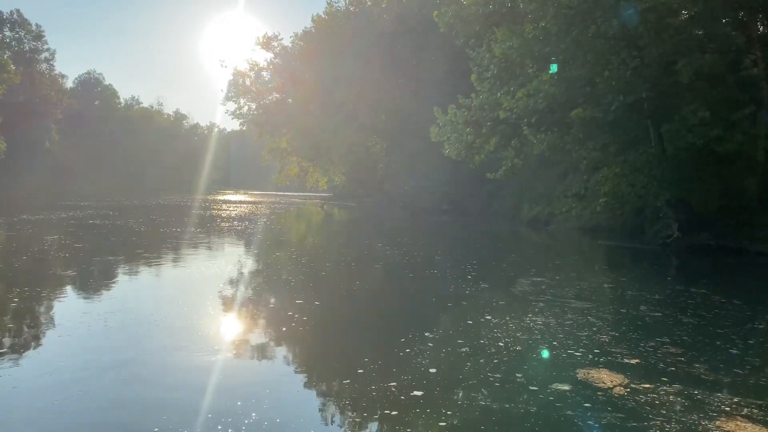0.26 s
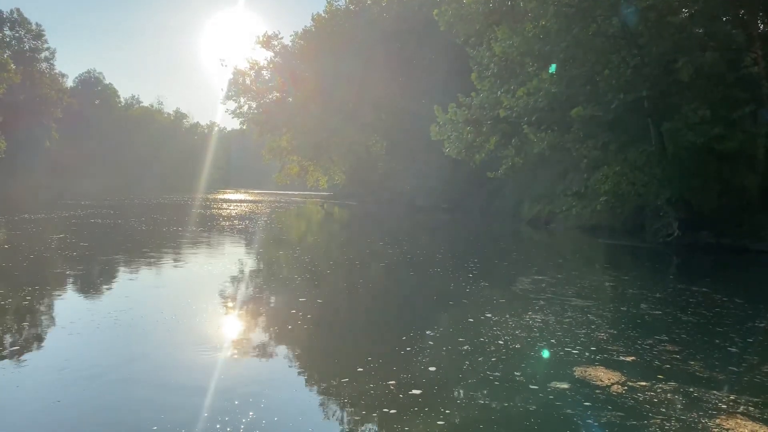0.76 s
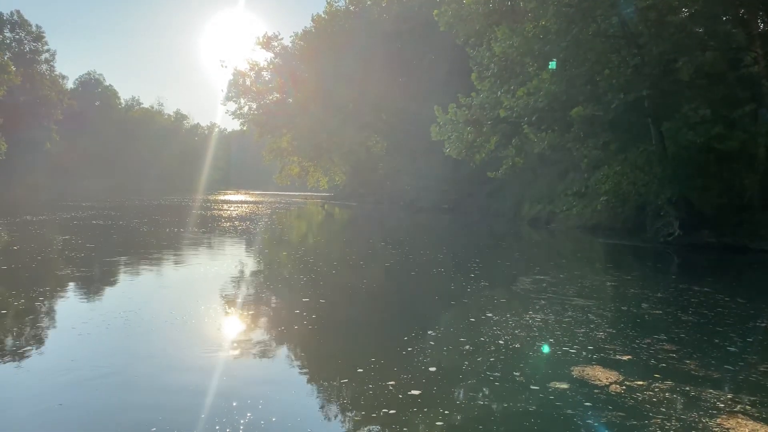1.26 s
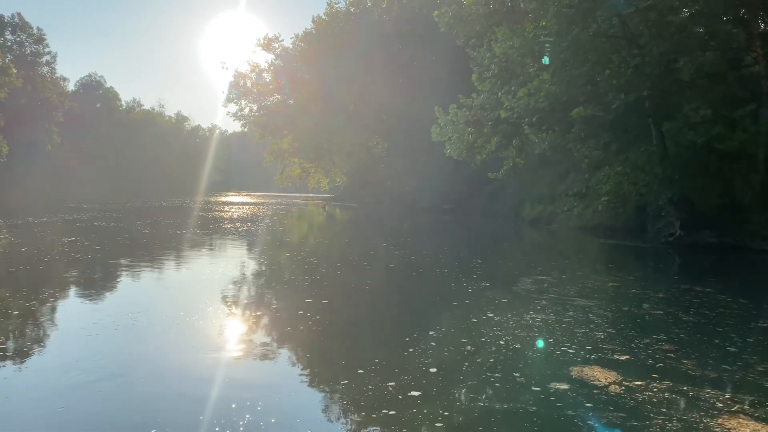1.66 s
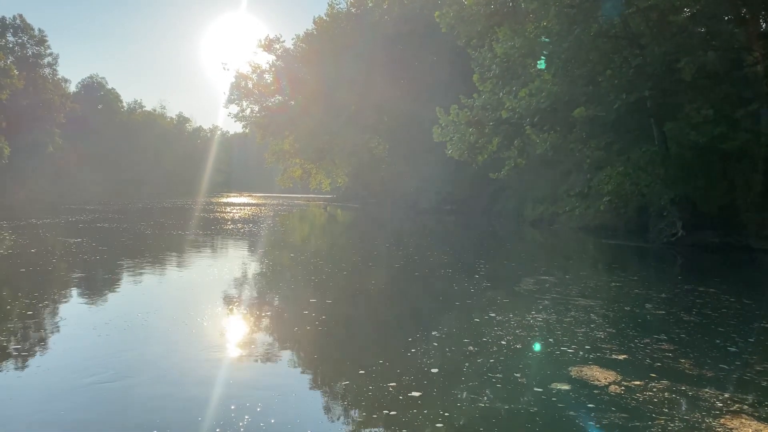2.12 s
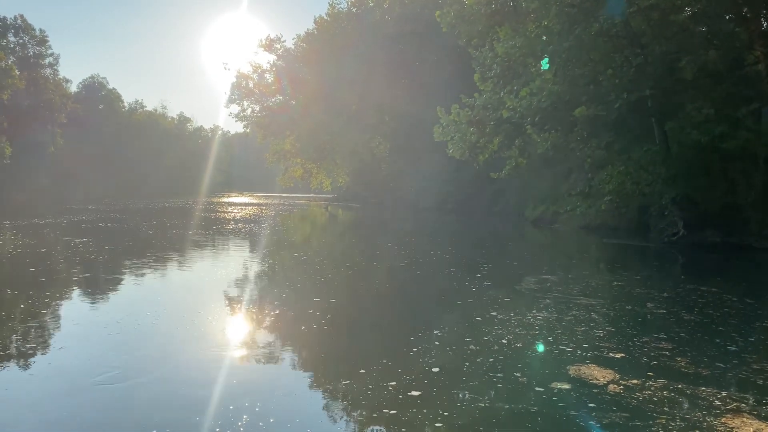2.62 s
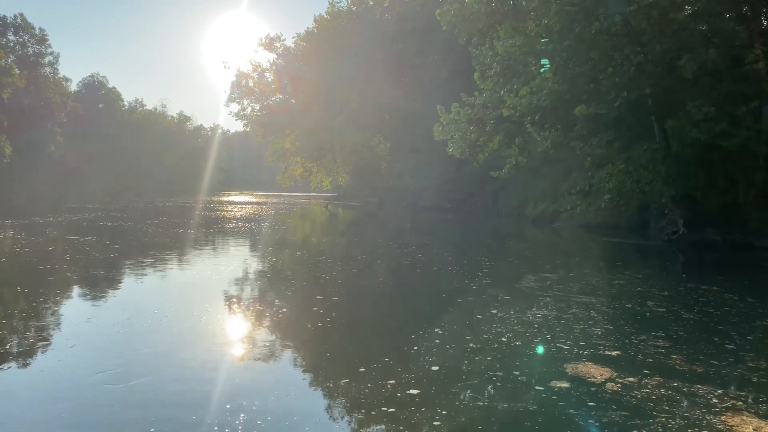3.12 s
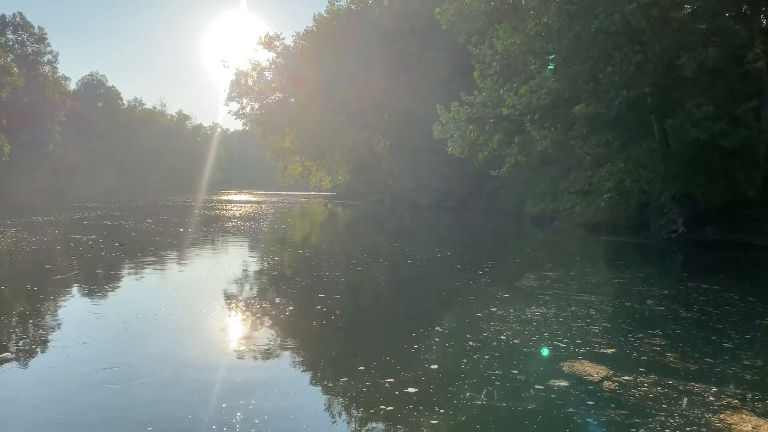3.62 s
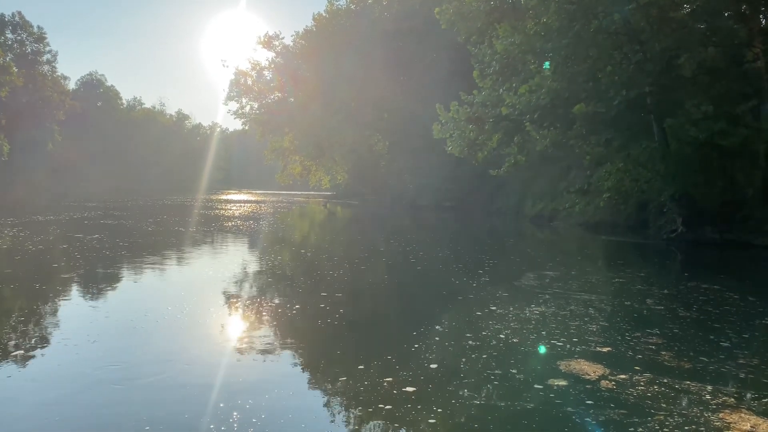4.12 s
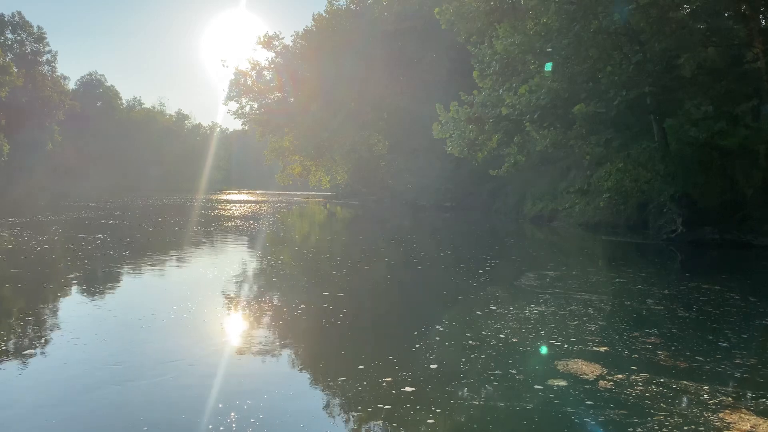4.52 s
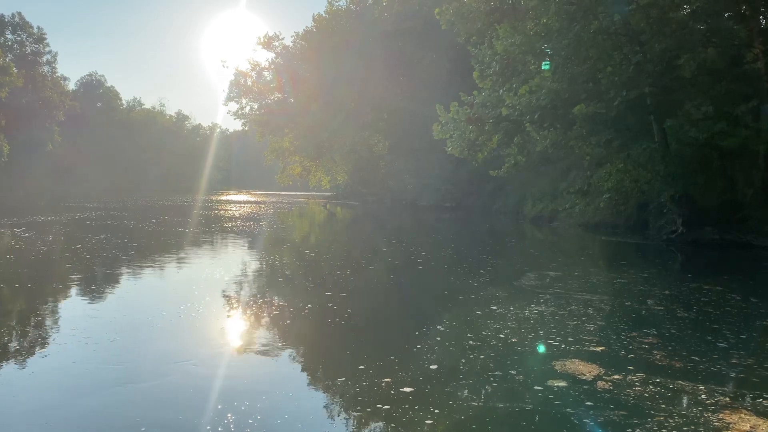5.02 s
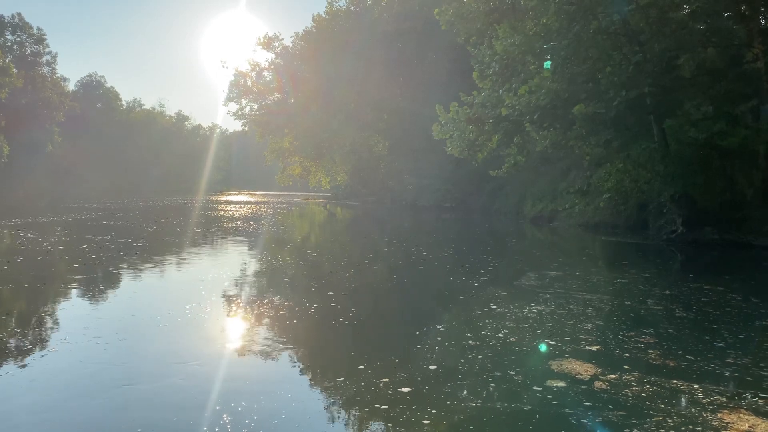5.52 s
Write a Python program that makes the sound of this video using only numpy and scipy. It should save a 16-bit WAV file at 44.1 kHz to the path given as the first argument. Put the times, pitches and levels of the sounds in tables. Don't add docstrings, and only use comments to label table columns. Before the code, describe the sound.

A cicada in riverside trees repeats a pulsing call: dry raspy clicks accelerate into a short, lower, smoother purr, then relax into rasping. The cycle begins quickly and gradually stretches to nearly a second. Wide, faint insect hiss and a gentle river hush stay constant underneath, while low soft wind buffets bump an unshielded stereo microphone, sparse early and denser later.

```python
import sys
import numpy as np
from scipy import signal
from scipy.fft import rfft, irfft, next_fast_len
from scipy.io import wavfile
from scipy.ndimage import uniform_filter1d

SR = 44100
rng = np.random.default_rng(int(sys.argv[2]) if len(sys.argv) > 2 else 0)


def inscribe(sig):
    pcm = np.round(np.clip(np.atleast_2d(sig).T, -1, 1) * 32767)
    wavfile.write(sys.argv[1], SR, pcm.astype(np.int16))


def undo_db(level):
    steps = np.asarray(level, float) / 20
    return 10 ** steps


N = 254456

# purr_start_s, purr_end_s, purr_clicks_per_s, slowest_clicks_per_s (after the purr)
PHRASES = [
    (-.3, -.16, 184, 127),
    (.41, .525, 184.2, 128),
    (.985, 1.085, 183.8, 125),
    (1.68, 1.77, 184.2, 125.5),
    (2.4, 2.515, 184.7, 123),
    (3.22, 3.355, 185.3, 123),
    (4.11, 4.235, 185.7, 121.5),
    (5.04, 5.155, 185.7, 122),
    (5.98, 6.1, 185.7, 122),
]
# from_purr_start_s, share_of_purr_rate
RUN_UP = [(-.19, .76), (-.11, .805), (-.07, .86), (-.03, .945), (0, 1)]
# from_purr_end_s, share_of_slowest_rate
SLOW_DOWN = [(.025, 1.04), (.135, 1), (.255, 1.05)]
# time_s (from purr start, purr end), belly_hz, belly_t60_s, belly_db, treble_db,
# roughness (0-1)
BELLY_OPENS = [(-.12, 4940, .015, 0, -14, .5), (-.055, 4830, .011, 0, -14, .35),
               (-.012, 4250, .007, 1, -36, .08), (.03, 3350, .0035, 4, -45, .03)]
BELLY_CLOSES = [(-.01, 3050, .0035, 4, -45, .04), (.02, 3750, .005, -5, -36, .4),
                (.07, 4400, .007, -4, -22, .5), (.15, 4920, .015, 0, -14, .5)]
# share_of_cycle, level_db
BUCKLES = [
    (0, 4.5),
    (.35, -5.5),
    (.53, 0),
]
CLICK_SCATTER = .8, 2
# pitch_hz, width_hz, level_db
FIXED_MODES = [(3265, 93, 19.5), (3970, 190, 3.5), (4257, 130, 7), (4700, 70, 12), (4850, 100, 10.5)]
CLIMAX_DB = [-36, -38.5, -38, -37, -37.5, -38, -37.5, -37.5, -37]
HOLLOW_DB = [0, 0.5, 0.5, 0.5, -2.5, 1, 0.5, 1, 2]
# from_purr_start_s (swell) or from_purr_end_s (fade), level_db
SWELL = [(-.3, -3.5), (-.13, -3.5), (-.01, 1)]
FADE = [(.005, -5.5), (.08, -5.5)]
# pitch_hz, level_db
LEAF_PATH = [(2300, -33), (2600, -4.5), (2900, 2.5), (3300, -1.5), (3600, 1.5), (4300, 0), (4950, -0.5),
             (5550, 3), (5720, -2), (7000, 0), (8200, -15), (8800, -3), (10000, -11.5), (10800, -38)]
# pitch_hz, level_db
LEAF_SCATTER = [(2800, -8), (3600, -5.5), (5000, 0.5), (9000, 2)]
# pitch_hz, t60_s
TREE_ECHO = [(2500, 0.58), (5000, 0.23), (10000, 0.014)]
# pitch_hz, lead_radians
PORT_LEAD = [(700, .5), (1300, .5), (1640, 2.8), (2700, 1.7), (2950, 2.9), (3600, 0), (4600, .6),
             (5250, -2.9), (6350, -.4), (8000, 0), (8400, 3.2), (9400, 2.8), (10300, 0), (11900, 0),
             (12400, 3.1)]
# pitch_hz, level_db
PORT_LEAN = [(60, -4), (100, 6), (170, -0.5), (290, 0), (500, 1.5), (840, 5), (1430, 1), (2430, -1),
             (4110, -0.5), (6980, -1.5)]
# pitch_hz, level_db (per Hz)
CHORUS = [(2000, -120), (2500, -30), (3000, -19), (3300, -2.5), (3700, 0), (4600, 4), (5300, 0), (5900, -4),
          (6550, 0), (7300, -9), (8000, -18), (9000, -39), (10000, -55)]
KATYDIDS = [(8000, -42), (9000, -6), (10200, -2.5), (11000, -4.5), (11800, -4.5), (12300, 6), (13200, -6),
            (14200, 1), (15500, -36)]
HUSH = [(59, -37), (100, -21.5), (121, -5), (141, -6.5), (166, -3), (239, -8), (314, -7.5), (430, -9),
        (665, -1.5), (935, -11.5), (1280, -5.5), (1590, -14), (1900, -8), (2090, -15.5), (2600, -18.5),
        (3380, -26), (5720, -120)]
RUMBLE = [(15, -120), (25, -36), (40, -7), (58, 7), (80, -9), (120, 0.5), (200, -55), (400, -120)]
# time_s, level_db
KATYDID_LEVEL = [(0, 1.5), (3.3, 2.5), (3.7, 2), (4.3, 2), (4.6, 2), (4.95, 1), (5.15, 1), (5.5, 4),
                 (5.77, 1)]
# pitch_hz, likeness
HUSH_ALIKE = [(60, -0.39), (120, 0.88), (230, 0.99), (460, 0.55), (910, 0.62), (1790, 0.058),
              (3540, -0.015), (6980, -0.06)]
# middle_s, peak_db, pitch_hz
PUFFS = [(.314, -52, 76), (.916, -48, 65.6), (1.042, -42, 65), (1.674, -47.5, 66), (2.615, -47.5, 51),
         (3.137, -44, 52.6), (3.197, -39.5, 63.4), (3.255, -44.5, 57), (3.367, -46, 58),
         (3.483, -42.5, 58.3), (3.608, -45.5, 96), (3.65, -41, 65), (3.73, -44, 64.4), (4.011, -36, 57.4),
         (4.075, -45, 75), (4.122, -38.5, 82.4), (4.168, -43.5, 81.5), (4.353, -42, 75.5),
         (4.406, -38, 57.7), (4.47, -38, 105), (4.491, -38, 69.4), (4.722, -43, 65), (4.845, -48, 71.5),
         (5.043, -42.5, 57), (5.141, -40.5, 68), (5.174, -41, 77), (5.222, -45, 63), (5.338, -39.5, 78.5),
         (5.401, -45, 62), (5.616, -49, 65.6)]
# time_s, peak_db
BREEZE = [(0, -72), (.24, -76), (.32, -49), (.5, -63), (.75, -52), (1.3, -57.5), (1.43, -66), (1.75, -57),
          (1.92, -65), (2.12, -49), (2.45, -56), (2.6, -55.5), (3.3, -53), (3.88, -48), (4.24, -54),
          (4.8, -56), (5.5, -57), (5.77, -58)]

EDDY_GAP_S, EDDY_HZ, EDDY_SPREAD, EDDY_SCATTER_DB = .052, 68, 0.23, -3
WIND_DB, WINDWARD_DB, VEER_DB = -62, 5.5, 6.5


def unit(x):
    return x / np.sqrt(np.mean(x ** 2) + 1e-20)


def along(points, hz):
    f, v = np.transpose(points)
    return np.interp(np.log(hz + 1), np.log(f + 1), v)


def curves(rows, t):
    s, *cols = np.transpose(sorted(map(tuple, rows)))
    return [np.interp(t, s, c) for c in cols]


def filtered(x, response):
    m = next_fast_len(N + SR // 2)
    return irfft(rfft(x, m) * response(np.fft.rfftfreq(m, 1 / SR)), m)[..., :N]


def ports(hz):
    half = undo_db(along(PORT_LEAN, hz) / 2) * np.exp(.5j * along(PORT_LEAD, hz))
    return np.array([half, 1 / half])


def rings(s, hz, t60, gain, size):
    at = np.ceil(s * SR).astype(int)[:, None] + np.arange(size)
    t = at / SR - s[:, None]
    wave = gain[:, None] * undo_db(-60 * t / t60) * np.sin(2 * np.pi * hz[:, None] * t)
    return np.bincount(at.clip(0, N).ravel(), wave.ravel(), N + 1)[:N]


def fixed_modes(hz):
    boost = 1
    for centre, width, db in FIXED_MODES:
        boost = boost + undo_db(db) * 1j * hz * width / (centre * centre - hz * hz + 1j * hz * width)
    return boost


def tymbal_clicks(t):
    pace = [(a + s, share * fast) for a, b, fast, slow in PHRASES for s, share in RUN_UP]
    pace += [(b + s, share * slow) for a, b, fast, slow in PHRASES for s, share in SLOW_DOWN]
    pace += [(b, fast) for a, b, fast, slow in PHRASES]
    cycles = np.cumsum(curves(pace, t)[0]) / SR
    lag, db = np.tile(BUCKLES, (int(cycles[-1]), 1)).T
    s = np.interp(np.arange(len(lag)) // len(BUCKLES) + lag, cycles, t)
    return s, lag, db


def singing_effort(t):
    effort = []
    for (a, b, *_), top, hollow in zip(PHRASES, CLIMAX_DB, HOLLOW_DB):
        effort += [(a + s, top + db) for s, db in SWELL]
        effort += [(b + s, top + db) for s, db in FADE]
        effort += [((a + b) / 2, top + hollow - 2)]
    return curves(effort, t)[0]


def cicada():
    t = np.arange(N) / SR
    s, lag, db = tymbal_clicks(t)
    posture = [(a + s0, *v) for a, b, *_ in PHRASES for s0, *v in BELLY_OPENS]
    posture += [(b + s0, *v) for a, b, *_ in PHRASES for s0, *v in BELLY_CLOSES]
    belly_hz, t60, belly_db, treble_db, rough = curves(posture, s)
    chance = rng.standard_normal((len(s), 3))
    s = np.abs(s + 0.00023 * rough * chance[:, 0])
    db = db - 7 * (lag > 0) * (1 - 2 * rough)
    gain = undo_db(db + (CLICK_SCATTER[0] + CLICK_SCATTER[1] * rough) * chance[:, 1])
    detune = 1 + .02 * rough * chance[:, 2]

    belly = rings(s, belly_hz * detune, t60[:, None], gain * undo_db(belly_db), size=700)
    treble = rings(s, 9800 * (1 + 0.053 * chance[:, 2]), 0.0044, gain * undo_db(treble_db + 12), size=150)
    shoulder = rings(s, 5400 * (1 + 0.069 * chance[:, 1]), 0.0077, gain * undo_db(treble_db + 6), size=250)
    snap = rings(s, 1700 + 0.69 * belly_hz, 0.00097, gain * undo_db(3.5), size=80)
    long_ring = rings(s, 3260 * detune, 0.02, gain * undo_db(-19), size=600)

    body = belly + treble + shoulder + long_ring + filtered(snap, fixed_modes)
    song = filtered(body, lambda hz: undo_db(along(LEAF_PATH, hz)))
    song /= np.sqrt(np.abs(uniform_filter1d(song ** 2, size=1500)) + 1e-12)
    return song * undo_db(singing_effort(t) - 1.6)


def trees(x):
    hz, t, z = signal.stft(rng.standard_normal((2, SR // 2)), SR, nperseg=256)
    tail = signal.istft(z * undo_db(-60 * t / along(TREE_ECHO, hz)[:, None]), SR, nperseg=256)[1]
    late = np.pad(x, (300, 0))
    return signal.fftconvolve(late[None], tail / np.linalg.norm(tail[0]), axes=1)[:, :N]


def rush(spectrum, alike, patchy_db):
    z = signal.stft(rng.standard_normal((2, N)), nperseg=512)[2]
    field = uniform_filter1d(rng.standard_normal(z.shape[1:]), size=6, axis=0)
    field = uniform_filter1d(field, size=14, axis=1)
    pair = signal.istft(z * undo_db(patchy_db * unit(field)), nperseg=512)[1][:, :N]

    def mid_and_side(hz):
        turn = np.arccos(np.clip(along(alike, hz), -1, 1)) / 2
        return undo_db(along(spectrum, hz)) * np.array([np.cos(turn), np.sin(turn)])

    mid, side = filtered(pair, mid_and_side)
    return unit(filtered(np.array([mid + side, mid - side]), ports))


def far_chorus():
    return undo_db(-45) * rush(CHORUS, [(3000, 0.25), (8000, 0.14)], patchy_db=1.67)


def katydids():
    level_db = -72.5 + curves(KATYDID_LEVEL, np.arange(N) / SR)[0]
    return undo_db(level_db) * rush(KATYDIDS, [(9000, 0.69), (11500, 0.49), (12600, 0.87)], patchy_db=3.0)


def river():
    return undo_db(-53) * rush(HUSH, HUSH_ALIKE, patchy_db=1.0)


def wind():
    rumble = undo_db(WIND_DB) * rush(RUMBLE, [(50, 1.0)], patchy_db=2.0)
    air = np.pad(rumble, ((0, 0), (0, SR)))
    t = np.arange(-SR // 20, SR // 12) / SR
    chance = rng.standard_normal((int(N / SR / EDDY_GAP_S) - 1, 3))
    when = EDDY_GAP_S * (np.arange(len(chance)) + 2 + .25 * chance[:, 0].clip(-2, 2))
    peak_db = curves(BREEZE, when)[0] + EDDY_SCATTER_DB * chance[:, 1]
    small = np.transpose([when, peak_db, EDDY_HZ * np.exp(EDDY_SPREAD * chance[:, 2])])
    distance_s = np.abs(when[:, None] - np.transpose(PUFFS)[0]).min(axis=1)
    clear = distance_s > EDDY_GAP_S * .7
    for s, db, hz in [*PUFFS, *small[clear]]:
        pan_db = rng.normal(WINDWARD_DB, VEER_DB)
        slip = rng.normal(0, .5) + rng.normal(0, .6, (2, 1))
        turns = (t + 0.0021) * hz
        shape = np.exp(-(turns / np.where(turns < 0, .5, 1.05)) ** 2)
        swing = shape * np.sin(2 * np.pi * (turns - 0.082 * turns ** 2) + 0.56 + slip)
        gain = undo_db(db + 1.5 + pan_db * np.array([[.5], [-.5]]))
        air[:, round(s * SR) - SR // 20:][:, :len(t)] += gain * swing
    return air[:, :N]


def scene():
    song = cicada()
    direct = undo_db(-2.0) * filtered(song, ports)
    scattered = undo_db(-2.5) * trees(filtered(song, lambda hz: undo_db(along(LEAF_SCATTER, hz))))
    return direct + scattered + far_chorus() + katydids() + river() + wind()


def band_limit(x):
    return signal.sosfilt(signal.butter(12, 14500, fs=SR, output="sos"), x)


def record(dry):
    return band_limit(dry)


dry = scene()
out = record(dry)
inscribe(out)
```